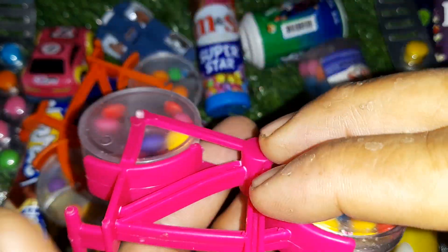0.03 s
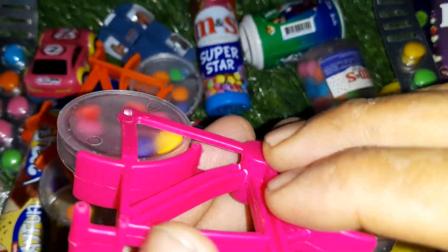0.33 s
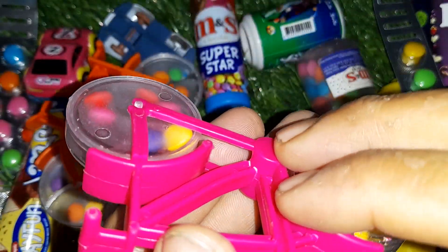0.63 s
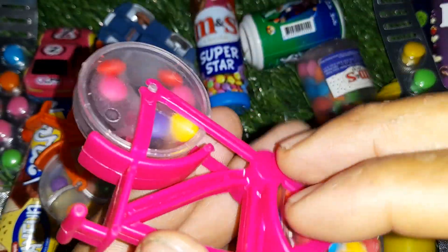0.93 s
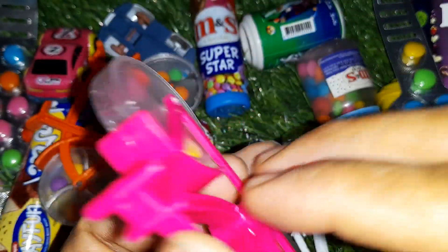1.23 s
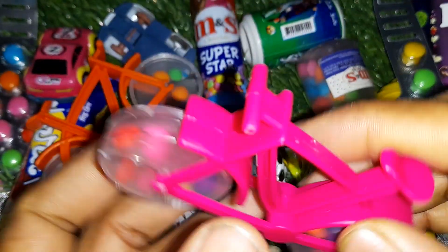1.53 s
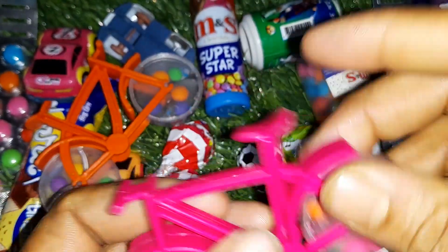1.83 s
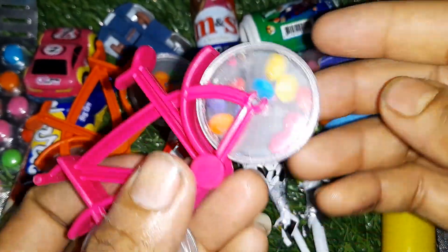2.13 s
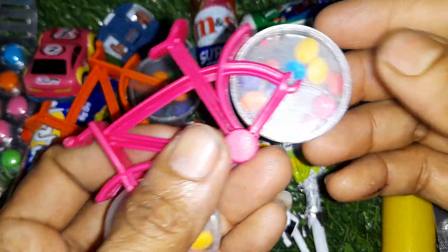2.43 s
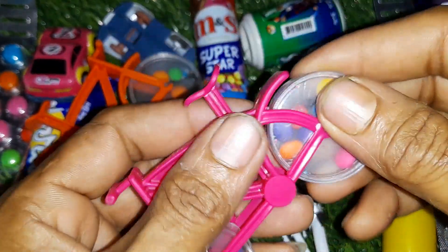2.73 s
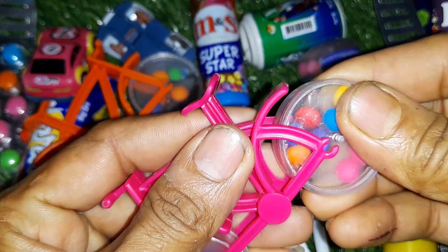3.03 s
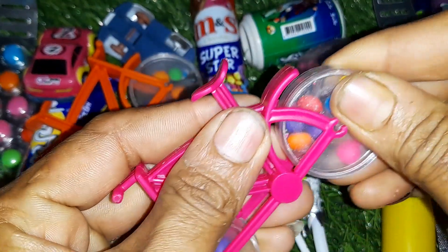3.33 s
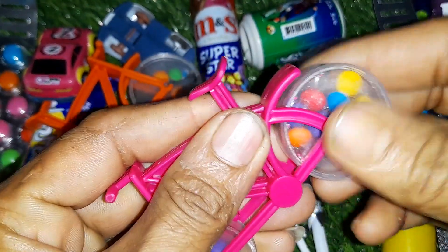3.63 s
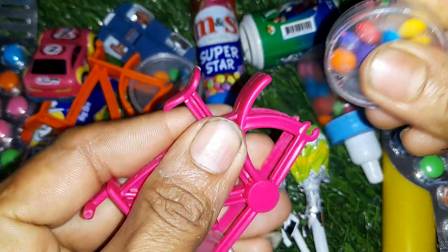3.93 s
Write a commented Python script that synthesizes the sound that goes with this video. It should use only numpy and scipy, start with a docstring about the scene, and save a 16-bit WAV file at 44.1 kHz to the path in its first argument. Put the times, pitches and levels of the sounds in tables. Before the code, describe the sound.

Plastic clicking and rattling comes in short bursts as sweets roll around a handheld toy. Near the end its lid snaps, a thumb rubs briefly, and a louder clatter of snaps follows, all close up over a faint room hum.

```python
"""Loose sweets rattle and roll in the hollow wheels of a small plastic toy bicycle, turned in the hands
close by. A thumb rubs over one wheel and prises at its lid, which snaps and clatters near the end.
Each knock or snap is a burst of tiny contacts that rings the plastic; the rubbing is grainy noise.
A low hum fills the quiet room, and birds call faintly far away in soft, gliding tones."""
import sys
import numpy as np
from scipy import signal
from scipy.fft import rfft, irfft
from scipy.io import wavfile

SR = 44100
rng = np.random.default_rng(int(sys.argv[2]) if len(sys.argv) > 2 else 0)


def bounce(signal):
    """Save signal as a 16-bit WAV file at the path given by the first command-line argument."""
    frames = np.transpose(np.atleast_2d(signal))
    limited = np.clip(frames, -1, 1)
    pcm = np.round(limited * 32767).astype(np.int16)
    wavfile.write(sys.argv[1], SR, pcm)


N = 176400
T = np.arange(N) / SR

# Sweets rolling along a wheel: start_s, length_s, level_db, pitch_hz
ROLLS = [(0, .035, -52, 2480), (1.318, 0.051, -57.5, 5000), (1.411, 0.057, -49, 2600),
         (1.505, 0.091, -49, 2580), (1.608, 0.27, -65, 2500), (1.783, 0.36, -70.5, 2780),
         (2.572, .075, -56, 2220), (2.651, 0.062, -65, 2200), (2.724, 0.13, -59, 2120),
         (3.189, 0.068, -61.5, 2080)]
# Strokes of skin on plastic: start_s, rise_s, fall_s (per 20 dB), level_db, lowpass_hz
RUBS = [(0, 0.0097, 0.17, -62.5, 6150), (0.219, 0.058, 0.11, -65, 6200), (0.759, 0.13, 0.039, -70, 10300),
        (1.357, 0.056, 0.33, -58, 5840), (1.721, 0.031, 0.53, -62.5, 5160), (2.371, 0.11, 0.095, -92, 6000),
        (2.572, 0.016, 0.14, -71, 7840), (3.224, 0.038, 0.13, -42, 7400), (3.42, 0.067, 0.21, -62, 6000),
        (3.538, 0.031, 0.14, -41.5, 2100)]
# Tone of the friction: frequency_hz, level_db
RUB_SPECTRUM = [(200, -14.5), (450, -1), (800, -9), (1300, -3.5), (2200, -4.5), (4000, -10), (9000, -9),
                (11000, -8), (16000, -11.5)]
# Tone of the room's rumble and hiss: frequency_hz, level_db
HUM_SPECTRUM = [(12, -66), (20, -37), (50, -13), (86, -9.5), (120, -0.5), (182, -15), (222, -14.5),
                (347, -19.5), (377, -28), (422, -25.5), (607, -40.5), (802, -39.5), (1100, -48),
                (3340, -48.5), (5200, -50), (6500, -59), (9000, -50), (16000, -55)]
# Stereo image of that noise: frequency_hz, correlation (1 is mono, 0 is wide)
HUM_CORRELATION = [(30, 0.84), (100, 0.95), (300, 0.81), (800, 0), (2000, 0), (16000, 0)]
# Resonances of the plastic shell: pitch_hz, level_db, t60_s
SHELL_MODES = [(1390, -2.5, 0.0024), (1900, -8, 0.0068), (2173, -5, 0.021), (2476, -2, 0.014),
               (2895, -7, 0.01), (3470, 1.5, .005), (4140, -0.5, 0.0034), (4744, 1.5, 0.0089),
               (5426, 2.5, 0.009), (5820, -3.5, 0.0029), (7010, 2.5, 0.0074), (8200, 0, 0.012),
               (11400, -17, 0.0017), (13000, -8.5, 0.0044)]
# Light knocks of sweets and loose parts: start_s, level_db, pitch_hz, treble_db, pan_left_db, chatter_s
KNOCKS = [(0.0094, -41, 5000, 11, 10, 0.0022), (0.036, -21.5, 3400, 5, 3, 0.0012),
          (0.0499, -24.5, 3570, 17, -1, 0.0014), (0.0699, -20, 3260, -24, 8.5, 0.00065),
          (0.0957, -37, 4100, -2, -13, 0.0009), (0.1923, -39.5, 4060, 28, 4, 0.001),
          (1.1628, -46.5, 5150, 2.5, 5, 0.002), (1.2995, -29, 5300, 16.5, 2, 0.00079),
          (1.332, -39, 5750, -3, 4, 0.00095), (1.3699, -31.5, 7060, 4, 19, 0.0017),
          (1.3745, -33.5, 5380, 7, -14, 0.0012), (1.3834, -21.5, 5840, 9, 4.5, 0.0018),
          (1.38, -36, 2500, -4, 11, 0.00065), (1.395, -31.5, 5530, -8, 9, 0.00066),
          (1.4179, -25, 5470, -3, 2, 0.0026), (1.4238, -25.5, 2460, 5, 7, 0.00059),
          (1.4438, -32, 2600, -6, 6, 0.00057), (1.4464, -19.5, 2960, 5, 6.5, 0.0013),
          (1.477, -35, 5130, 10, 4, 0.001), (1.484, -31.5, 6900, 15, 3, 0.0011),
          (1.5104, -37.5, 4570, 11, 20, 0.00104), (1.5069, -29, 7000, 2, 3, 0.00082),
          (1.5287, -34.5, 2340, -10, 11, 0.0014), (1.5363, -26.5, 2900, -11, -1, 0.0017),
          (1.5469, -28, 2550, -21, 20, 0.0018), (1.5493, -39, 2560, -9, -13, 0.00048),
          (1.56, -22.5, 2600, -19, -0.5, 0.0016), (1.5788, -52, 3950, -10, 12, 0.0011),
          (1.592, -27.5, 4470, -17, 2, 0.0012), (1.677, -49.5, 5340, -6, 6, 0.00086),
          (1.7388, -39, 4180, -15, 9, 0.003), (1.756, -31, 4300, -23, -8, 0.002),
          (1.765, -33.5, 3560, -20, 12, 0.0024), (1.7773, -34.5, 6670, -3, 6, 0.0057),
          (1.7878, -21.5, 7000, 0, 3.5, 0.0021), (1.8023, -27, 6860, -8, -10, 0.0025),
          (1.807, -24, 4530, -12, 6, 0.0045), (1.869, -31, 3650, -15, 9.5, 0.0026),
          (1.876, -31, 5300, -15, -2, 0.0015), (2.584, -43, 4770, 11, 13, 0.0019),
          (2.595, -30, 8000, 6, -2, 0.0018), (2.605, -44, 3060, -5, 5, 0.0012),
          (2.613, -34, 2220, 15, 6, 0.00096), (2.666, -45.5, 2260, -20, 16, 0.00049),
          (2.679, -56, 2340, -13, 6, 0.0014), (2.739, -45, 2140, -18, 0.5, 0.0012),
          (2.7506, -26, 2280, -13, -0.5, 0.001), (2.7761, -35.5, 2200, -19, -5, 0.0013),
          (2.792, -35, 2400, -23, 8, 0.0029), (2.8, -23.5, 2220, -28, 2.5, 0.00027),
          (2.832, -59, 2190, -15, -3, 0.00089), (2.8754, -31, 2080, 1, 5, 0.0018),
          (3.0683, -38.5, 2190, 2, 2, 0.00082), (3.06, -40, 4780, -1, 1, .002),
          (3.6133, -37.5, 1850, -2, 3, 0.001), (3.679, -42, 1920, 3, -2.5, 0.0013),
          (3.9264, -26, 5370, 10, 1.5, 0.0016)]
# Reverb of the small room: frequency_hz, level_db, t60_s
ROOM_REVERB = [(300, -9, 1), (1000, -12.5, 0.27), (1700, -17.5, 0.16), (2220, -14, .22), (2900, -11.5, 0.2),
               (4400, -13.5, 0.18), (7690, -15.5, 0.22), (11000, -11.5, 0.1), (14900, -9, 0.1)]
# Low hoots and thin whistles: start_s, length_s, pitch_hz, glide_share, arch_share, level_db
BIRD_CALLS = [(.15, 0.099, 680, -0.059, 0.025, -80), (.4, 0.23, 802, 0.033, 0.07, -77.5),
              (.77, 0.21, 842, 0.05, 0.042, -83), (1.01, .21, 796, -0.13, 0.0039, -76.5),
              (1.79, 0.24, 805, -0.02, 0.029, -81), (2.07, 0.14, 738, -0.067, .01, -80),
              (2.58, .21, 808, -0.047, 0.0094, -74.5), (2.84, 0.28, 737, -0.043, 0.0027, -75.5),
              (0.979, 0.14, 2960, 0.032, 0.031, -76), (2.06, 0.18, 4280, -0.1, -0.035, -74.5)]
# The lid slipping on its rim: start_s, level_db, pitch_hz, treble_db, pan_left_db, chatter_s, thump_db
LID_SNAPS = [(2.9533, -9.5, 3470, 7, 2, 0.004, -30), (2.9559, -8, 2020, 11, 2, 0.002, -21.5),
             (2.9568, -6, 2025, 0, 4, 0.0014, -26.5), (2.9712, -15, 2250, 5.5, -0.5, 0.0012, -30),
             (2.981, -21, 2170, 4, 2, 0.00059, -38.5), (2.9932, -21.5, 5520, -2, -1, 0.0013, -36),
             (3.0166, -15, 5200, 2, -1.5, 0.0013, -37), (3.0268, -26, 2330, -0.5, -1, 0.0011, -21),
             (3.5989, -29.5, 1560, -19.5, -9, 0.0015, -6.5), (3.7171, -1, 1714, 2.5, 1.5, 0.0012, -21),
             (3.7195, -5, 8200, 8.5, 0.5, 0.003, -27), (3.7364, -17, 3960, 18, -1, 0.0086, -30),
             (3.7575, -22.5, 5430, 8, -4, 0.0015, -44), (3.8132, -11, 6850, -4, 3.5, 0.0021, -15.5),
             (3.818, -6.5, 2100, 8.5, -6, 0.0071, -26.5), (3.8232, -8.5, 2170, 12, 11, 0.00062, -37),
             (3.8327, -12.5, 2270, -2, -1, 0.002, -26.5), (3.8338, -13.5, 2150, -2, 4, 0.0011, -19),
             (3.842, -13, 5700, 16, -2.5, 0.0022, -38), (3.8480, -12, 2070, -13, 0, 0.0014, -36),
             (3.8516, -22, 2100, -18, 18, 0.006, -48), (3.8715, -25.5, 2280, 6, -6, 0.0014, -17),
             (3.8875, -32, 2270, 1, -1, .0006, -28)]

ROLL_GRAINS_PER_S, ROLL_SPREAD_DB, ROLL_T60_S = 2200, 3, .005
SCRAPE_DB, SCRAPE_BAND_HZ, RUB_GRAIN_DB = -10, (1700, 7150), 3
HUM_DB, DRONE_DB, DRONE_HZ, DRONE_WAVER_HZ = -55.5, -65, 123.6, 4.55
CONTACTS_PER_S, CHATTER_GAIN, CHATTER_RISE_S = 8000, 0.96, 0.00026
MODE_SPREAD_DB, SIDE_SPREAD_DB, GRIP_DETUNE_SHARE = 3, 1, .045
ANTIPHASE_HZ = 4230  # from here up, about half the modes have opposite signs left and right
CRACK_DB, CRACK_HZ, SHELL_LOW_HZ, TREBLE_HZ, THUMP_BAND_HZ = -8, 2220, 1360, 8780, (93, 555)
SPOT_BOOST_DB, SPOT_Q, SPOT_KNEE_HZ, SPOT_FADE_DB_PER_OCT = 15.5, 8.8, 2700, 5.5
KNOCK_GAIN_DB, KNOCK_THUMP_DB, SNAP_GAIN_DB = 13, -32.5, 12
KNOCK_DELAY_S, RIGHT_LAG_S, ROOM_DELAY_S, ROOM_BUILD_S = .0009, .0001, 0.0011, 0.00091
BIRD_WAVER_SHARE, BIRD_DIRECT_DB, BIRD_ECHO_DB, BIRD_ECHO_T60_S = 0.033, -3.5, 5.5, 0.46


def from_db(db):
    """Decibels to gain."""
    return 10 ** (np.asarray(db) / 20)


def unit(x):
    """Scale to an average energy of one per channel."""
    return x / np.sqrt(np.mean(np.sum(x ** 2, axis=-1)) + 1e-20)


def at_hz(points, hz, column=1):
    """Read a column of a table on a log-frequency axis."""
    table = np.array(points)
    return np.interp(np.log(np.maximum(hz, 1)), np.log(table[:, 0]), table[:, column])


def cut(x, hz, kind, order=2):
    """Butterworth filter."""
    sections = signal.butter(order, np.clip(hz, 10, SR / 2 - 100), kind, fs=SR, output="sos")
    return signal.sosfilt(sections, x)


def ring(x, hz, t60):
    """One damped resonance."""
    r = np.exp(-np.log(1000) / (t60 * SR))
    return signal.lfilter([1, 0, -1], [1, -2 * r * np.cos(2 * np.pi * hz / SR), r * r], x + 1e-18)


def coloured(x, spectrum):
    """EQ noise to a spectrum; rms 1."""
    gains = from_db(at_hz(spectrum, np.fft.rfftfreq(N, 1 / SR)))
    return unit(irfft(rfft(x) * gains, N)) * np.sqrt(N)


def wander(below_hz):
    """Smooth random modulation; rms 1."""
    return unit(cut(rng.standard_normal(N), below_hz, "low")) * np.sqrt(N)


def swell(start, length):
    """A rounded rise and fall."""
    return np.sqrt(np.maximum(np.sin(np.pi * np.clip((T - start) / length, 0, 1)), 0))


def add(out, start, sound):
    """Mix a sound in at a time."""
    i = max(int(start * SR), 0)
    out[:, i:i + sound.shape[1]] += sound[:, :N - i]


def rolling_sweets():
    """Rolling sweets make a stream of tiny contacts that scrape and keep the hollow wheel ringing."""
    signs = rng.choice([-1, 1], (2, N))
    sizes = from_db(ROLL_SPREAD_DB * np.minimum(rng.exponential(1, N), 4))
    grains = signs * sizes * (rng.random(N) < ROLL_GRAINS_PER_S / SR)
    scrape = from_db(SCRAPE_DB) * unit(cut(grains + 1e-18, SCRAPE_BAND_HZ, "band"))
    out = np.zeros((2, N))
    for start, length, db, hz in ROLLS:
        wheel = unit(ring(grains, hz, ROLL_T60_S))
        out += from_db(db) * swell(start, length) * unit(wheel + scrape) * np.sqrt(N)
    return out


def finger_rubs():
    """Fingers slide over the plastic: grainy friction that swells and fades."""
    grain = np.interp(T, np.linspace(0, T[-1], N // 64), rng.standard_normal(N // 64))
    noise = rng.standard_normal((2, N)) + rng.standard_normal(N)  # wide plus centre
    friction = coloured(noise * from_db(RUB_GRAIN_DB * grain), RUB_SPECTRUM)
    out = np.zeros((2, N))
    for start, rise, fall, db, lowpass_hz in RUBS:
        attack = np.clip((T - start) / rise, 0, 1)
        release = from_db(-20 * np.maximum(T - start - rise, 0) / fall)
        out += from_db(db) * attack * release * cut(friction, lowpass_hz, "low")
    return out


def room_hum():
    """A bed of low rumble with a wavering drone and a trace of wide hiss."""
    correlation = at_hz(HUM_CORRELATION, np.fft.rfftfreq(N, 1 / SR))
    mid, side = rfft(rng.standard_normal((2, N)))
    air = irfft(np.sqrt(1 + correlation) * mid + np.sqrt(1 - correlation) * side * [[1], [-1]], N)
    pitch = DRONE_HZ + DRONE_WAVER_HZ * wander(below_hz=5.7)
    drone = np.sqrt(2) * np.sin(2 * np.pi * np.cumsum(pitch) / SR)
    return from_db(HUM_DB) * coloured(air, HUM_SPECTRUM) + from_db(DRONE_DB) * drone


def shell_ring(force):
    """The shell's modes, retuned by the shifting grip, reach each side with their own level and sign."""
    modes = 0
    for hz, db, t60 in SHELL_MODES:
        mode_db = db + MODE_SPREAD_DB * rng.standard_normal()
        gains = from_db(mode_db + SIDE_SPREAD_DB * rng.standard_normal((2, 1)))
        held_hz = hz * (1 + GRIP_DETUNE_SHARE * rng.standard_normal())
        antiphase = rng.random() < .5 * min(hz / ANTIPHASE_HZ, 1)
        signs = rng.choice([-1, 1]) * np.array([[1], [1 - 2 * antiphase]])
        modes = modes + signs * gains * unit(ring(force, held_hz, t60))
    return unit(modes)


def plastic_hit(spot_hz, treble_db, pan_left_db, chatter_s, thump_db, size=2200):
    """A contact and its dying chatter excite a dry crack, the ringing shell and a low thump."""
    t = T[:size]
    pressure = (1 - np.exp(-t / CHATTER_RISE_S)) * np.exp(-t / chatter_s)
    force = CHATTER_GAIN * rng.standard_normal(size) * pressure
    force *= rng.random(size) < CONTACTS_PER_S / SR
    force[0] = 1  # the first contact
    crack = from_db(CRACK_DB) * unit(cut(force, CRACK_HZ, "high", order=3))
    shell = cut(crack + shell_ring(force), SHELL_LOW_HZ, "high", order=4)
    # The spot struck favours one pitch; higher ones ring less clearly.
    octaves_up = max(np.log2(spot_hz / SPOT_KNEE_HZ), 0)
    boost_db = max(SPOT_BOOST_DB - SPOT_FADE_DB_PER_OCT * octaves_up, 0)
    shell += (from_db(boost_db) - 1) * signal.lfilter(*signal.iirpeak(spot_hz, SPOT_Q, fs=SR), shell)
    shell += (from_db(treble_db) - 1) * cut(shell, TREBLE_HZ, "high", order=1)
    thump = from_db(thump_db) * unit(cut(force, THUMP_BAND_HZ, "band", order=3))
    hit = unit(shell) + thump
    hit[1] = np.interp(t - RIGHT_LAG_S, t, hit[1], left=0)
    return hit * from_db([[pan_left_db / 2], [-pan_left_db / 2]])


def sweet_knocks():
    """Sweets and loose parts knock lightly against the shell."""
    out = np.zeros((2, N))
    for start, db, *contact in KNOCKS:
        hit = plastic_hit(*contact, thump_db=KNOCK_THUMP_DB)
        add(out, start + KNOCK_DELAY_S, from_db(db + KNOCK_GAIN_DB) * hit)
    return out


def room_reverb(x, size=22050):
    """Diffuse reflections of a small room, dying faster in the treble."""
    t, tail = T[:size], 0
    build = 1 - np.exp(-np.maximum(t - ROOM_DELAY_S, 0) / ROOM_BUILD_S)
    edges_hz = np.geomspace(150, 18000, 22)
    for low, high in zip(edges_hz, edges_hz[1:]):
        hz = np.sqrt(low * high)
        decay = np.exp(-np.log(1000) * t / at_hz(ROOM_REVERB, hz, column=2))
        band = unit(cut(rng.standard_normal((2, size)), [low, high], "band") * build * decay)
        tail = tail + band * from_db(at_hz(ROOM_REVERB, hz)) * np.sqrt(2 * (high - low) / SR)
    return signal.fftconvolve(x, tail, axes=1)[:, :N]


def distant_birds(echo_size=16000):
    """Nearly pure, gently arching calls, blurred by distance."""
    calls, waver = 0, BIRD_WAVER_SHARE * wander(below_hz=60)
    for start, length, hz, glide, arch, db in BIRD_CALLS:
        from_middle = np.clip((T - start) / length, 0, 1) - .5
        pitch = hz * (1 + glide * from_middle - arch * (2 * from_middle) ** 2 + waver)
        calls = calls + from_db(db) * swell(start, length) * np.sin(2 * np.pi * np.cumsum(pitch) / SR)
    decay = np.exp(-np.log(1000) * T[:echo_size] / BIRD_ECHO_T60_S)
    tail = unit(rng.standard_normal((2, echo_size)) * decay)
    echoes = signal.fftconvolve(calls[None], tail, axes=1)[:, :N]
    return from_db(BIRD_DIRECT_DB) * calls + from_db(BIRD_ECHO_DB) * echoes


def lid_snaps():
    """The lid jumps over the rim in runs of hard slips."""
    out = np.zeros((2, N))
    for start, db, *contact in LID_SNAPS:
        add(out, start, from_db(db + SNAP_GAIN_DB) * plastic_hit(*contact))
    return out


def scene():
    """The toy up front with its room reverb, birds and hum behind."""
    toy = sweet_knocks() + lid_snaps() + rolling_sweets() + finger_rubs()
    return toy + room_reverb(toy) + distant_birds() + room_hum()


def record(dry):
    """A steep low-pass trims the very top of the mix."""
    cutoff_hz = 16200
    return signal.sosfilt(signal.ellip(10, .2, 80, cutoff_hz, fs=SR, output="sos"), dry)


dry = scene()
out = record(dry)
bounce(out)
```